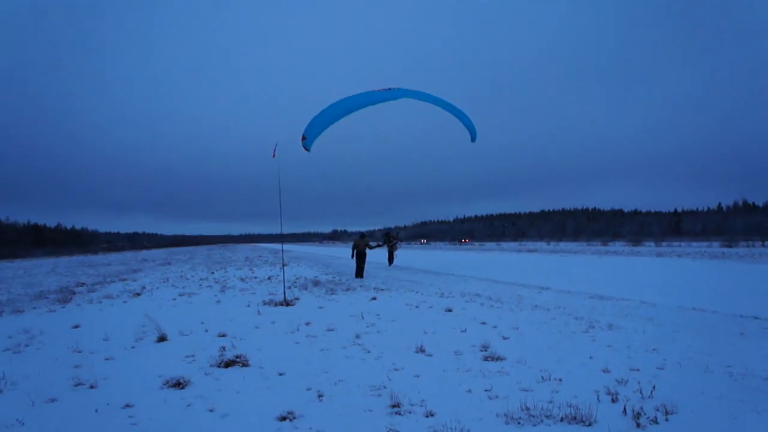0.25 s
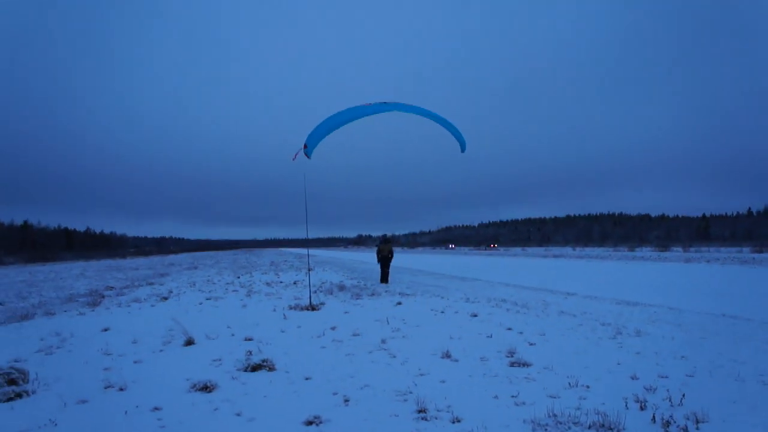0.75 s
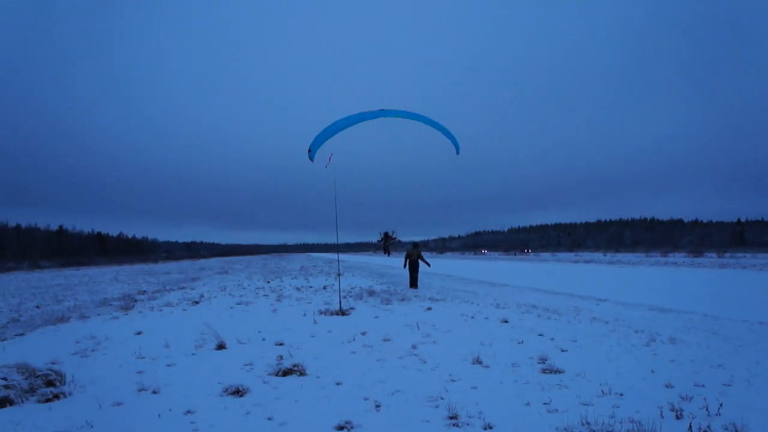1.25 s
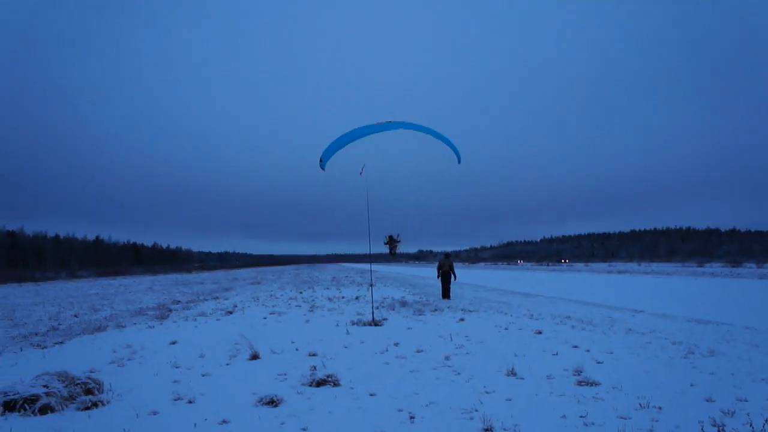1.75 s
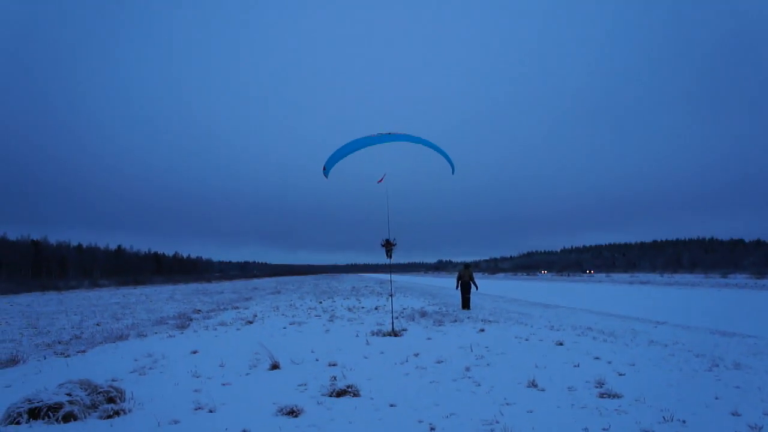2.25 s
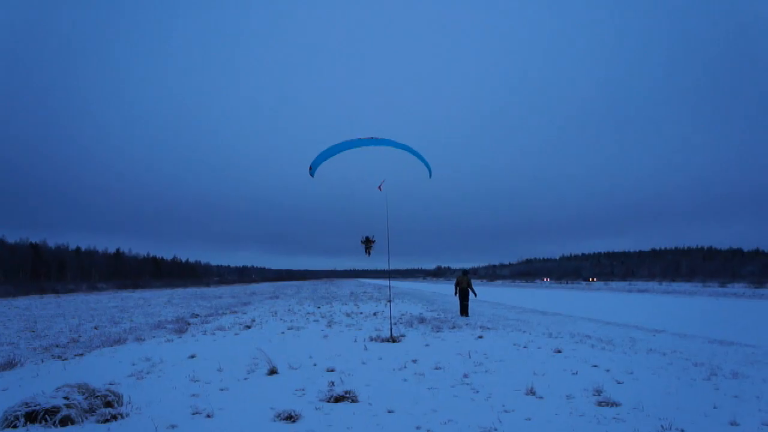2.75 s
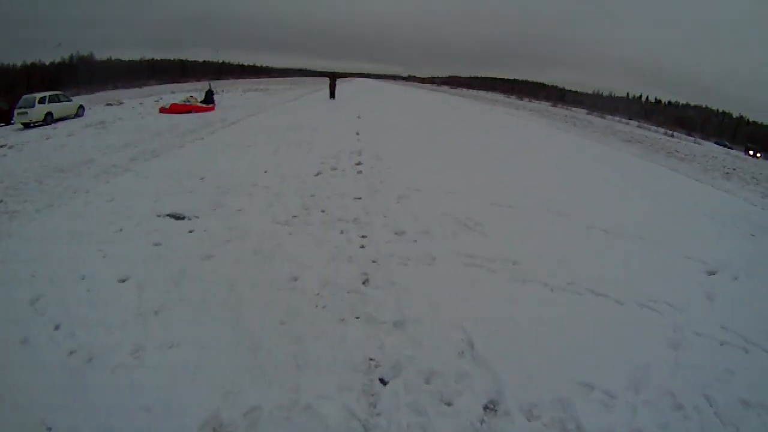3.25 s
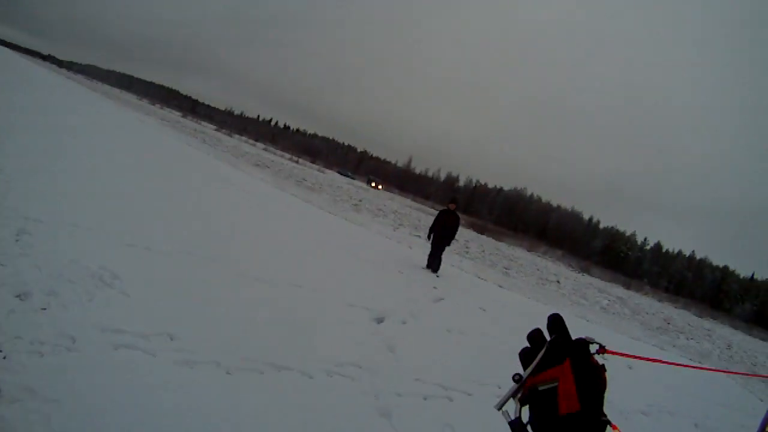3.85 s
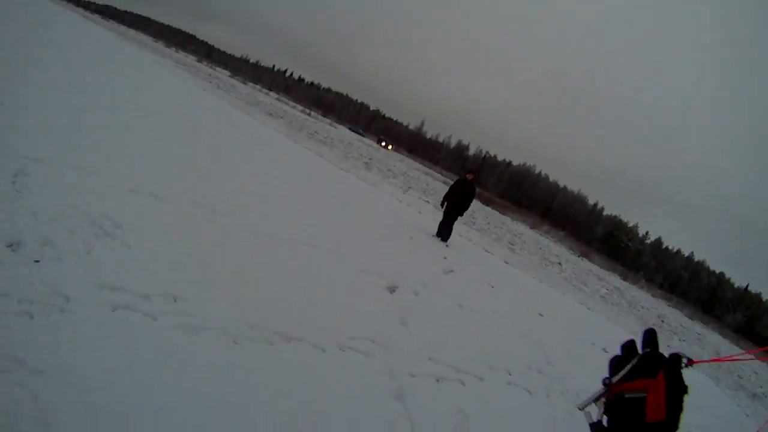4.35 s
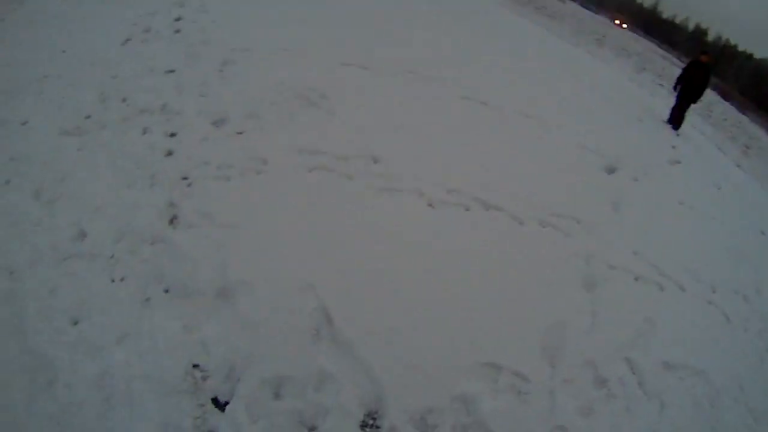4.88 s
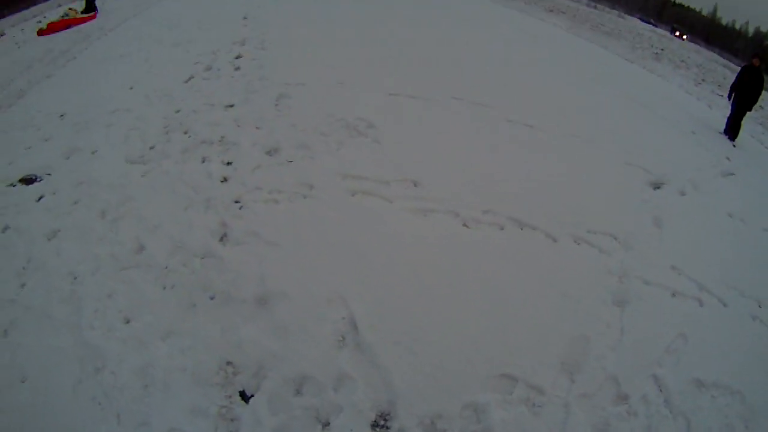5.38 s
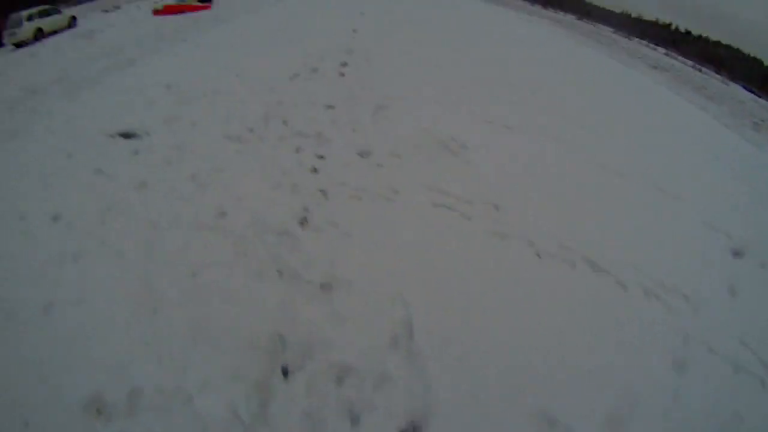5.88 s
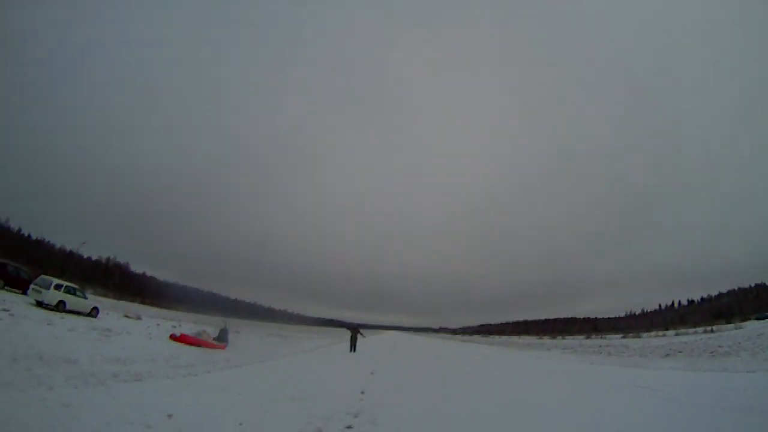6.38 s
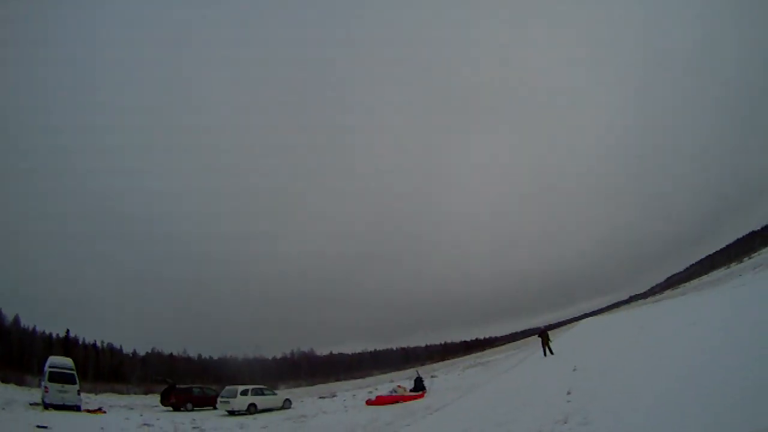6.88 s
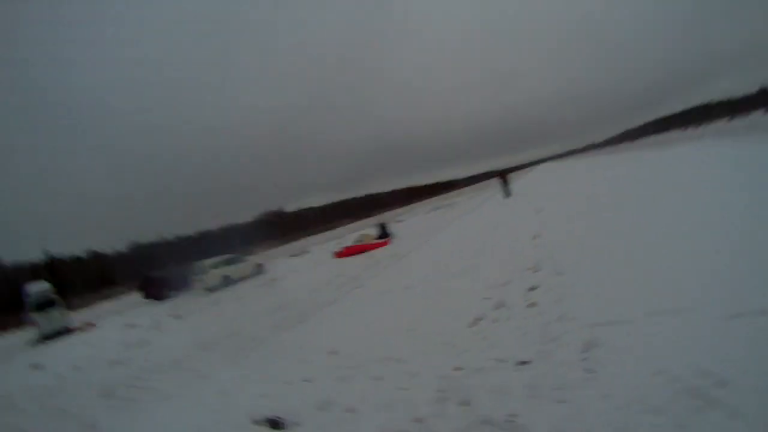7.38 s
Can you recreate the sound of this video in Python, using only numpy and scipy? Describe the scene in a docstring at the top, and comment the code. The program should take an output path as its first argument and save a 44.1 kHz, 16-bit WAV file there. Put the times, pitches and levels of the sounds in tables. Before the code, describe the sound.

First a paramotor-like engine at full throttle, heard outdoors in stereo: dense low drone, nasal whine, airy exhaust roar and soft wind gusts, thinning as it leaves. Then an abrupt switch to a much quieter, boxy mono sound of an idling two-stroke, with irregular dull knocks, fast ticking clatter and hiss. Its level and tone shift as the wearer's head turns, with slight low rubbing.

```python
"""Over a snowy field a small two-stroke propeller engine climbs away at full power before a windy stereo microphone;
its firing is a stack of wavering sine lines over pulsing roar noise, with low noise for breeze and gusts.
Then the scene switches to a muffled mono microphone worn close to an idling engine: noise bursts through
resonances are its uneven firings, and it ticks on every turn and hisses, louder or softer as the
wearer's head turns."""
import sys
import numpy as np
from scipy import signal
from scipy.fft import rfft, irfft
from scipy.io import wavfile
from scipy.ndimage import uniform_filter1d

SR = 44100
rng = np.random.default_rng(int(sys.argv[2]) if len(sys.argv) > 2 else 0)


def log_audio(samples):
    """Write samples as a 16-bit WAV file to the path given in sys.argv[1]."""
    # one column per channel
    frames = np.atleast_2d(samples).T
    # limit to full scale, then quantise
    limited = np.clip(frames, -1, 1)
    pcm = np.round(limited * 32767).astype(np.int16)
    wavfile.write(sys.argv[1], SR, pcm)


def ratio(d):
    """dB to gain"""
    e = np.asarray(d, float) / 20
    return 10 ** e


N = 336306
SWITCH_S = 2.9856   # from the far microphone to the worn one

# Left over right at the stereo microphone. Each row: frequency in Hz, level difference in dB.
BALANCE_DB = [(60, -2), (140, 5), (340, 1.5), (820, 5), (1960, 1), (4690, -2.5), (11200, 3)]
# Phase lead of the left side. Each row: frequency in Hz, lead in radians.
LEFT_LEAD = [(500, 0.34), (1640, -0.89), (2410, -1.58), (2930, -0.9), (4390, 0.98), (5000, -0.18)]
# The head turns to and from the idling engine. Each row: time in seconds, relative clatter level in dB,
# relative lift of the hiss over it in dB, knock pitch in Hz before each blow's own factor.
HEAD = [(3.0, -44.5, -6.5, 1430), (3.4, -42, -7.5, 1430), (3.72, -43, -1, 1400), (4.7, -42.5, -4.5, 1419),
        (5.14, -52, -2.5, 1376), (5.57, -51.5, -4.5, 1363), (6.1, -48.5, -3.5, 1390),
        (6.15, -46.5, -0.5, 1452), (6.34, -45, -1, 1520), (7.0, -41, -5.5, 1500), (7.32, -42, -4.5, 1551),
        (7.48, -42, -6.5, 1540), (7.62, -44, -8.5, 1560)]
# Uneven firings of the idling engine. Each row: time in seconds, relative level in dB.
FIRINGS = [(3.002, -36), (3.088, -40), (3.194, -27.5), (3.297, -28), (3.462, -27), (3.563, -29),
           (3.643, -29), (3.788, -31.5), (3.955, -28.5), (4.078, -29), (4.242, -26.5), (4.356, -27),
           (4.454, -32), (4.599, -32), (4.761, -28.5), (4.843, -28), (5.178, -40), (5.323, -36),
           (5.53, -36), (5.631, -34), (5.735, -36), (5.818, -34.5), (5.92, -37), (6.004, -35.5),
           (6.129, -36), (6.336, -31.5), (6.436, -27.5), (6.517, -28.5), (6.762, -27), (7.02, -29),
           (7.101, -28), (7.197, -29.5), (7.466, -33.5)]


def rms_one(x):
    """Scale to unit rms."""
    return x / np.sqrt(np.mean(x ** 2) + 1e-20)


def in_time(rows, n, start_s):
    """Columns of a curve table, one value a sample."""
    s, *columns = np.transpose(rows)
    return [np.interp(start_s + np.arange(n) / SR, s, c) for c in columns]


def at_hz(points, hz):
    """Read a spectrum on a log-frequency axis."""
    f, v = np.transpose(points)
    return np.interp(np.log(hz), np.log(np.maximum(f, 1)), v)


def plateau(distance, half_width):
    """Flat-topped bump, 1 in the middle."""
    return np.exp(-(distance / half_width) ** 4)


def soft_step(t, at_s, soft_s):
    """Smooth step from 0 to 1 around a moment."""
    return 1 / (1 + np.exp((at_s - t) / soft_s))


def drift(rate_hz, n):
    """Slow chance of spread 1: noise twice through a one-pole low-pass, drawn every 40 samples."""
    r = np.exp(-80 * np.pi * rate_hz / SR)
    slow = signal.lfilter([1], [1, -2 * r, r * r], rng.standard_normal(n // 40 + 2002))[2000:]
    return np.interp(np.arange(n) / 40, np.arange(len(slow)), rms_one(slow - slow.mean()))


def coloured(spectrum, n, count=1):
    """Unrelated noises shaped by a spectrum; rms 1."""
    hz = np.arange(1, n // 2 + 2) * SR / n
    return rms_one(irfft(rfft(rng.standard_normal((count, n))) * ratio(at_hz(spectrum, hz)), n))


def band(x, order, low_hz, high_hz):
    """Butterworth band-pass."""
    return signal.sosfilt(signal.butter(order, [low_hz, high_hz], "band", fs=SR, output="sos"), x)


def resonance(x, hz, width_hz):
    """Two-pole band-pass, gain 1 on top."""
    r = np.exp(-np.pi * width_hz / SR)
    return signal.lfilter([(1 - r * r) / 2, 0, (r * r - 1) / 2], [1, -2 * r * np.cos(2 * np.pi * hz / SR), r * r], x)


def rings(x, modes):
    """Resonances in parallel, signs alternating."""
    return sum((-1) ** k * ratio(db) * resonance(x, hz, w) for k, (hz, w, db) in enumerate(modes))


def spread(pair):
    """Two unrelated noises become left and right, alike and balanced per frequency."""
    # Each row: frequency in Hz, left-right likeness from 0 to 1.
    likeness = [(60, 0.18), (170, 0.53), (490, 1), (1380, 1), (3940, 0.77), (11200, 0.69)]
    mid, side = rfft(pair)
    hz = np.arange(1, len(mid) + 1) * SR / pair.shape[1]
    alike = np.clip(at_hz(likeness, hz), 0, 1)
    lean = ratio(at_hz(BALANCE_DB, hz) / 2)
    lead = np.exp(.5j * at_hz(LEFT_LEAD, hz))
    a, b = np.sqrt((1 + alike) / 2) * mid, np.sqrt((1 - alike) / 2) * side
    return irfft([(a + b) * lean * lead, (a - b) / lean / lead], pair.shape[1])


def treble_swing_db(n):
    """Swing of the climbing engine's treble about its mean, shared by roar and upper lines."""
    # Each row: time in seconds, relative level in dB.
    roar_level = [(0.0, -30.5), (0.19, -30), (1.09, -32.5), (1.38, -28), (1.95, -32.5), (2.2, -30.5),
                  (2.96, -35.5)]
    level_db, = in_time(roar_level, n, 0)
    return level_db - level_db.mean()


def firing_lines(n, turn, mean_rate):
    """Regular firings make a stack of lines; moving air makes them waver, neighbouring lines together."""
    # Each row: multiple of the firing rate, relative level in dB.
    firing_orders = [(1, -16.5), (2, -5.5), (3, -13), (4, -18), (5, -21), (6, -9), (7, -8), (8, -3.5),
                     (9, -3), (10, -6), (11, 0.5), (12, -5), (13, -3), (14, -7), (15, -13), (16, -22),
                     (17, -11.5), (18, -7.5), (19, -6), (20, -6), (21, 1.5), (22, -0.5), (23, -5), (24, -5),
                     (25, -5.5), (26, -7), (27, -8.5), (28, -12)]
    # The whine is a band of lines that slides upward, swells and widens as the craft climbs away.
    # Each row: time in seconds, centre in Hz, relative lift in dB, half width in Hz.
    whine = [(0.0, 1440, 9.5, 160), (0.15, 1380, 12, 160), (0.25, 1440, 8, 120), (0.45, 1560, 9, 131),
             (0.65, 1570, 0.5, 199), (0.95, 1690, 5.5, 334), (1.3, 1960, -1.5, 90), (1.55, 1670, -1, 90),
             (1.75, 1680, 6, 85), (2.2, 1665, 8, 85), (2.35, 1708, 12, 85), (2.65, 1703, 10.5, 90),
             (2.98, 1660, 8.5, 101)]
    # Each row: time in seconds, relative level of the drone lines in dB, blur by moving air as a factor.
    drone = [(0.0, 0, 0.84), (0.15, -7, 1.3), (0.25, 0.5, 0.98), (0.45, -2, 0.63), (1.1, 1.5, 0.65),
             (1.6, 1.5, 0.52), (1.9, 0, 0.91), (2.35, -2.5, 1.26), (2.98, -4, 1.6)]
    # Runs of harder, crisper firings.
    # Each row: middle in seconds, relative lift in dB, centre in Hz, half length in seconds.
    bark_runs = [(0.144, 5, 1600, .02), (0.232, 3, 1300, .012), (0.393, 2.5, 1110, .012),
                 (0.481, 8, 1140, 0.01), (0.657, 3, 850, 0.012), (0.755, 3, 1000, .012),
                 (0.998, 2, 860, 0.018), (1.098, 3, 960, 0.012), (1.266, 2.5, 950, 0.023),
                 (1.52, 2, 900, 0.011)]
    t = np.arange(n) / SR
    centre_hz, lift_db, width_hz = in_time(whine, n, 0)
    drone_db, blur = in_time(drone, n, 0)
    barks = np.array([db * np.exp(-.5 * ((t - s) / half_s) ** 2) for s, db, _, half_s in bark_runs])
    bark_db, bark_hz = barks.sum(axis=0), np.array(bark_runs)[:, 2]
    settled = np.clip((2.2 - t) / .6, .35, 1)   # the whine steadies late in the climb
    # the second order beats with a close blade tone: depth .56, null at 1 s, every 1.335 s
    beat = abs(1 - .56 * np.exp(2j * np.pi * (t - 1) / 1.335))
    treble_db = treble_swing_db(n)
    air = [drift(1.3, n) for eddy in range(14)]
    upper = [(k, -13.0 - .5 * (k - 29)) for k in range(29, 46)]
    # strong and weak firings alternate a little
    halves = [(k + .5, -20.0 - 2.0 * abs(k - 21.5)) for k in range(19, 25)]
    out = np.zeros((2, n))
    for k, level_db in firing_orders + upper + halves:
        hz = k * mean_rate
        change = lift_db * plateau(hz - centre_hz, width_hz) + drone_db * plateau(hz - 940, 510)
        # lines near 460 Hz come up late in the climb
        change = change + 13 * np.exp(-np.log(hz / 460) ** 2 / 0.023) * soft_step(t, 2.4, 0.23)
        if k == 2:
            change = change + 20 * np.log10(beat + .01)
        elif k == 3:   # drops away as the craft leaves the ground
            change = change - 1.5 * soft_step(t, 1.4, 0.12)
        elif k > 28:
            change = change + treble_db

        # the main whine and the lowest lines hold their notes
        steady = min(max(abs(k - 22) - 1, 0) / 2 + .25, k / 5, 1)
        loose = ratio(-2 * bark_db) * (blur if k < 18 else .65 * settled if k < 29 else 1)
        flicker = 2.7 * steady * (settled if 19 < k < 26 else .5 if k == 11 else 1) * drift(4.85, n)
        fill = 2.05 if 14 < k < 18 else 1   # the weak lines between drone and whine fill in most
        db = level_db - 24.5 + change - change.mean() + flicker
        db = db + fill * plateau(hz - bark_hz, 390) @ barks
        if 22 < k < 27:   # the lines above the whine join in one after another
            db = db + 6 * soft_step(t, 2.37 + 0.16 * (k - 23), 0.1)

        j, part = divmod(k / 4, 1)   # one eddy shifts about four lines
        shared = (1 - part) * air[int(j)] + part * air[int(j) + 1]
        # the pipe draws each whine pulse out into a falling glide
        smear = .8 * (np.clip(k, 20, 24) - 22) ** 2 * (k > 16)
        waver = loose * (1.3 * min(k / 5, 1) * shared + .6 * steady * drift(1.2, n))
        shiver = .42 * steady * np.minimum(loose + .3, 1) * drift(15, n)
        phase = k * (turn - 2 * np.pi * .22) + waver + shiver + smear   # lag of .22 turn
        for side, sign in enumerate([1, -1]):
            own = 0.68 * ratio(-bark_db) * (settled if 19 < k < 27 else 1) * steady * min(hz / 1500, 1.6)
            own = own * drift(1.58, n) + sign * at_hz(LEFT_LEAD, hz) / 2
            out[side] += ratio(db + sign * at_hz(BALANCE_DB, hz) / 2) * np.sin(phase + own)
    return out


def whistles(n):
    """Thin whistles: noise through narrow resonances that swell and fade."""
    # Each row: middle in seconds, half length in seconds, pitch in Hz, relative level in dB.
    thin_whistles = [(0.3, .2, 4570, -46), (0.45, .1, 2850, -42), (0.65, .12, 3150, -44)]
    t = np.arange(n) / SR
    return sum(ratio(db) * plateau(t - s, half_s) * rms_one(resonance(rng.standard_normal(n), hz, 25))
               for s, half_s, hz, db in thin_whistles)


def roar(n, turn):
    """Turbulent exhaust and blade noise that pulses with each firing; its body thins out with distance."""
    # Each row: frequency in Hz, relative level in dB per Hz.
    roar_colour = [(180, -39), (300, -42), (420, -32.5), (700, -12.5), (850, -12.5), (1240, -16),
                   (1670, -14), (1970, -15), (3000, -21), (4300, -24), (5000, -25.5), (5800, -29.5),
                   (7000, -32), (7800, -31), (11000, -36.5)]
    puffs = 1 + 0.13 * np.cos(turn)
    noise = spread(coloured(roar_colour, n, count=2)) * puffs
    noise = noise * ratio(-25.0 + treble_swing_db(n) + drift(12, n))
    body = signal.sosfilt(signal.butter(2, 2200, fs=SR, output="sos"), noise)
    thinning_db = -5 * soft_step(np.arange(n) / SR, 1.75, 0.13)
    return noise + body * (ratio(thinning_db) - 1)


def full_power(n):
    """Each firing has its own strength and comes a little early or late; lines, whistles and roar add up."""
    # Each row: time in seconds, firings per second.
    speed_curve = [(0.0, 78.6), (0.03, 78.4), (0.46, 78.0), (0.63, 78.3), (1.19, 78.2), (1.63, 77.7),
                   (2.01, 77.6), (2.57, 78.1), (2.98, 78.1)]
    speed, = in_time(speed_curve, n, 0)
    early_late_turns, uneven_db = .0012, .9
    turn = 2 * np.pi * (np.cumsum(speed) / SR + early_late_turns * drift(18.3, n))   # radians
    tones = firing_lines(n, turn, speed.mean()) + whistles(n)
    return tones * ratio(uneven_db * drift(26.6, n)) + roar(n, turn)


def burst(decay_s, rise_s, front):
    """A puff of gas: a sharp front, then noise under an exponential rise and decay."""
    t = np.arange(3000) / SR
    puff = rng.standard_normal(len(t)) * (1 - np.exp(-t / rise_s)) * np.exp(-t / decay_s)
    puff[0] = front
    return puff


def pops(n):
    """The charge lights only every few turns: a knock, a thud below, a spit above; taps and clicks alike."""
    # Dull higher taps between firings. Each row: time in seconds, relative level in dB.
    taps = [(4.052, -36), (4.16, -34), (4.27, -37), (4.645, -34), (4.89, -31.5), (5.002, -37), (5.117, -33),
            (5.282, -34), (5.708, -24.5), (5.832, -36), (5.947, -37.5), (6.674, -43), (7.225, -36)]
    # Thin bright clicks. Each row: time in seconds, relative level in dB.
    clicks = [(5.066, -43), (5.075, -47), (6.87, -41.5)]
    # Resonances of thud, spit and click. Each row: pitch in Hz, width in Hz, relative level in dB.
    pop_bass = [(844, 67, 8.5), (1045, 78, 7.5), (380, 200, -14)]
    pop_treble = [(3310, 310, 12.5), (4490, 240, 6), (4860, 120, 1), (5660, 280, 8), (6800, 1800, 0),
                  (13000, 4000, -28)]
    click_ring = [(4340, 330, 6), (6860, 630, 9), (11800, 1200, -8)]
    # rows, thud dB and spit dB against the knock, pitch factor, spit decay in s, spit resonances;
    # the taps' negative decay makes their spit swell until it is cut off
    kinds = [(FIRINGS, -4, -4.5, 1.0, .015, pop_treble),
             (taps, -15.5, -22, 1.3, -1.5, pop_treble),
             (clicks, -20, 11, 1.2, .003, click_ring)]
    colour_scatter_db, pitch_scatter = 1.4, 0.011
    out = np.zeros(n + 3000)
    usual_hz = in_time(HEAD, n, SWITCH_S)[2]
    for rows, bass_db, treble_db, pitch, spit_s, top in kinds:
        for s, db in rows:
            i, luck = round((s - SWITCH_S) * SR), rng.standard_normal(3)
            knock_hz = usual_hz[i] * pitch * (1 + pitch_scatter * luck[0])
            blow = resonance(burst(decay_s=0.0075, rise_s=0.00026, front=8.0), knock_hz, 500)
            knock = resonance(blow, knock_hz, 58) + 0.14 * blow
            thud = rings(burst(decay_s=0.028, rise_s=0.00018, front=20.0), pop_bass)
            spit = band(rings(burst(spit_s, rise_s=spit_s / 8, front=.5), top), 3, 3000, 13000)
            low, high = ratio(np.array([bass_db, treble_db]) + colour_scatter_db * luck[1:])
            out[i:i + 3000] += ratio(db) * (rms_one(knock) + low * rms_one(thud) + high * rms_one(spit))
    return ratio(-17.0) * out[:n]


def afterglow(n, fade_s):
    """Each firing kicks the crank, so the next few turns rattle harder; about 1 after a firing, fading to 0."""
    kicks = np.zeros(n)
    kicks[[round((row[0] - SWITCH_S) * SR) for row in FIRINGS]] = 1
    return signal.lfilter([1], [1, -np.exp(-1 / (fade_s * SR))], kicks + 1e-18)


def heard(rows, rest_db, ramp_s, n):
    """Gain that rises from a resting level around each span, with soft ends."""
    t = SWITCH_S + np.arange(n) / SR
    return ratio(rest_db) + sum(ratio(db) * np.clip(np.minimum(t - a, b - t) / ramp_s + 1, 0, 1) ** 2
                              for a, b, db in rows)


def crank(n):
    """Turns of the idling crank: it speeds up at a firing and slows until the next."""
    # Each row: time in seconds, turns per second before the firings are aligned.
    turns_per_s = [(3.0, 49.6), (3.99, 45.4), (4.32, 47.7), (5.07, 46.3), (5.26, 45), (6.0, 44.8),
                   (6.65, 53.2), (7.62, 45.3)]
    turns = np.cumsum(in_time(turns_per_s, n, SWITCH_S)[0]) / SR
    lit = np.array([0] + [round((s - SWITCH_S) * SR) for s, db in FIRINGS] + [n - 1])
    # firings fall on the start of a turn
    turns = turns + np.interp(np.arange(n), lit, np.round(turns[lit]) - turns[lit] + 1)
    gap = np.interp(np.arange(n), lit, np.arange(len(lit)))
    which = np.minimum(gap.astype(int), len(lit) - 2)
    sag = 0.1202 * np.minimum(np.diff(turns[lit]), 4)[which]   # share of the speed, over four turns at most
    return turns + sag * (gap % 1) * (1 - gap % 1)


def clatter_and_hiss(n, turns, strength):
    """Coloured noises that tick on every turn, harder after a firing, and follow the wearer's head."""
    # Clatter and hiss. Each row: frequency in Hz, relative level in dB per Hz.
    clatter_colour = [(260, -57), (450, -22), (585, -6.5), (706, -9), (838, 1), (931, -4.5), (1290, -7.5),
                      (1440, 5.5), (1590, -4.5), (1760, 2), (2380, -15.5), (2700, -15.5), (3510, -56),
                      (5940, -120)]
    hiss_colour = [(1590, -59), (2700, -55), (2820, 0), (3190, 8), (3600, 10), (3920, 2.5), (4300, 11),
                   (4630, -3), (5010, 8), (5330, -4), (5700, 4.5), (7280, 3), (9760, -8), (11700, -12),
                   (15200, -22), (22000, -120)]
    # Narrow rings in the hiss. Each row: pitch in Hz, width in Hz, relative level in dB.
    hiss_rings = [(4280, 110, -0.5), (4860, 180, -3), (5660, 58, -3), (6270, 120, -3), (6550, 120, -1),
                  (7840, 210, -9), (8550, 110, -18), (9400, 95, -9)]
    clatter_db, brighter_db, _ = in_time(HEAD, n, SWITCH_S)
    kicked = 0.69 + 0.79 * afterglow(n, fade_s=0.053)
    tick = kicked * strength * np.exp(-(turns % 1) / 0.36)
    clatter = coloured(clatter_colour, n)[0] * (0.77 + 0.92 * tick) * ratio(clatter_db - 4.0)
    hiss = coloured(hiss_colour, n)[0] + 0.31 * rms_one(rings(rng.standard_normal(n), hiss_rings))
    return clatter + hiss * (0.75 + 0.56 * tick ** 1.7) * ratio(clatter_db + brighter_db)


def silencer(n):
    """The silencer hums on one wavering note with a noisy resonance, swelling shortly after each firing."""
    # Each row: start in seconds, end in seconds, relative level in dB.
    silencer_heard = [(2.9, 4.65, -55.5), (6.95, 7.7, -56)]
    note_hz, width_hz, waver_hz, lag_s = 544, 29, 9, 0.018
    hum = np.sin(2 * np.pi * np.cumsum(note_hz + waver_hz * drift(11.9, n)) / SR)
    ring = rms_one(hum + 0.57 * rms_one(resonance(rng.standard_normal(n), note_hz, width_hz)))
    swell = np.roll(uniform_filter1d(afterglow(n, fade_s=0.047), size=600), round(lag_s * SR))
    return ring * (0.64 + swell) * heard(silencer_heard, -74, 0.58, n)


def casing(n, turns, strength):
    """The casing rings when struck about half a turn later than the tick."""
    # Each row: pitch in Hz, width in Hz, relative level in dB.
    casing_modes = [(1648, 40, 7), (823, 29, -2), (2120, 41, -4)]
    # Each row: start in seconds, end in seconds, added level in dB.
    casing_heard = [(3.4, 4.6, -56.5), (6.25, 6.75, -48), (6.85, 7.7, -49)]
    later = turns + .45
    strokes = np.diff(np.floor(later), prepend=np.floor(later[0]))
    rattle = rng.standard_normal(n) * np.exp(-(later % 1) / .12) + 20 * strokes
    return rms_one(rings(rattle * strength ** .4, casing_modes)) * heard(casing_heard, -72, 0.25, n)


def intake(n, turns, strength):
    """One gulp a turn, every second one deeper, and steady noise sound through the intake's resonances."""
    # Each row: pitch in Hz, width in Hz, relative level in dB.
    intake_modes = [(295, 116, 7), (380, 98, 1), (190, 41, -2.5)]
    whole = turns.astype(int)
    strokes = np.diff(whole, prepend=whole[0])   # one click a turn
    gulps = rms_one(strokes * strength ** .3 * (1 + .2 * (-1) ** whole)) + .45 * rng.standard_normal(n)
    return rms_one(band(rings(gulps, intake_modes), 2, 150, 450)) * ratio(-65.5)


def cough(n):
    """Each firing coughs back through the intake: a kick through two resonances."""
    hz, width_hz = 367, 70
    kick = np.diff(afterglow(n, fade_s=.004), prepend=0)
    return rms_one(resonance(resonance(kick, hz, width_hz), hz, 2 * width_hz)) * ratio(-72.5)


def idling(n):
    """Every turn gives a small tick of its own strength in clatter, hiss, casing and intake."""
    turns = crank(n)
    strength = ratio(4.4 * np.clip(rng.standard_normal(400), -2, 1.1))[turns.astype(int)]
    engine = clatter_and_hiss(n, turns, strength) + silencer(n)
    return engine + casing(n, turns, strength) + intake(n, turns, strength) + cough(n)


def rubs(n):
    """Low rumble on the worn microphone: drifting low noise that rises in short spans."""
    # Each row: frequency in Hz, relative level in dB per Hz.
    rumble_colour = [(20, -13), (50, -6), (100, -8.5), (180, -16), (300, -33)]
    # Each row: start in seconds, end in seconds, added level in dB before the drift.
    rub_spans = [(2.95, 3.03, -66), (3.3, 3.45, -68), (5.7, 5.74, -76), (6.32, 6.4, -69), (6.55, 6.6, -73),
                 (6.9, 7.0, -70)]
    return coloured(rumble_colour, n)[0] * heard(rub_spans, -79, .1, n) * ratio(3.9 * drift(3.9, n))


def wind(n):
    """Lumpy low noise, its own on each port: a freshening breeze and short gusts."""
    # Each row: frequency in Hz, relative level in dB per Hz.
    wind_colour = [(25, -44), (60, -26), (85, -9.5), (115, -10), (200, -13), (400, -23), (800, -64)]
    # Gusts on the ports. Each row: middle in seconds, relative level in dB, left-right difference in dB.
    gust_rows = [(.44, -46, -11), (.86, -38.5, 0), (1.4, -39, -8), (1.63, -40.5, -10), (1.87, -40, 7),
                 (1.95, -46, -11), (2.12, -45, -16), (2.55, -42, -23), (2.83, -41, -19), (2.95, -45, -15)]
    gust_s, lean_db = 0.026, -1.5
    t, lean = np.arange(n) / SR, np.array([[.5], [-.5]])
    breeze = ratio(-53.5 + 5 * t)   # rises 5 dB a second
    gusts = sum(ratio(db + lean * pan) * np.exp(-.5 * ((t - s) / gust_s) ** 2) for s, db, pan in gust_rows)
    lumps_db = np.array([3 * drift(12, n), 3 * drift(12, n)])
    return coloured(wind_colour, n, count=2) * (breeze + gusts) * ratio(3.5 + lean * lean_db + lumps_db)


def scene():
    """The far stereo microphone, its top cut at 11150 Hz, then the worn mono one."""
    n = round(SWITCH_S * SR)
    far = full_power(n) + wind(n)
    far = signal.sosfilt(signal.ellip(12, .5, 70, 11150, fs=SR, output="sos"), far)
    near = pops(N - n) + idling(N - n) + rubs(N - n)
    return np.concatenate([far, [near, near]], axis=1)


def top_cut(x):
    """Nothing passes above the cut-off."""
    return signal.sosfilt(signal.butter(12, 15400, fs=SR, output="sos"), x)


def record(dry):
    """The finished mix as it is kept."""
    return top_cut(dry)


dry = scene()
out = record(dry)
log_audio(out)
```